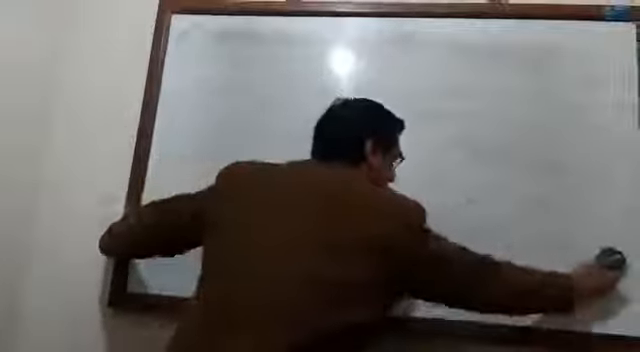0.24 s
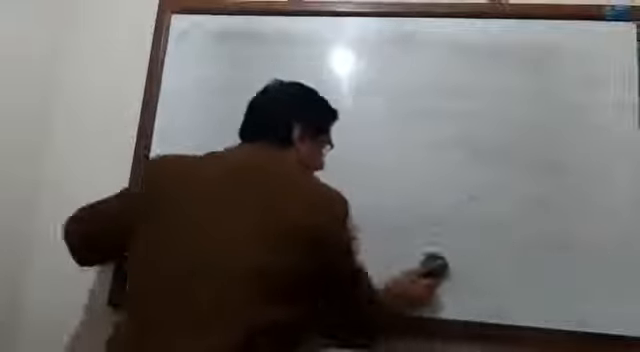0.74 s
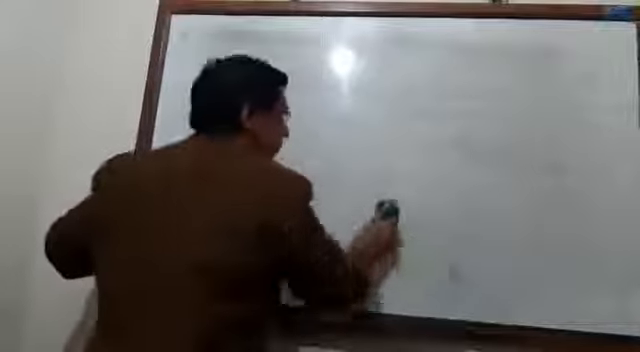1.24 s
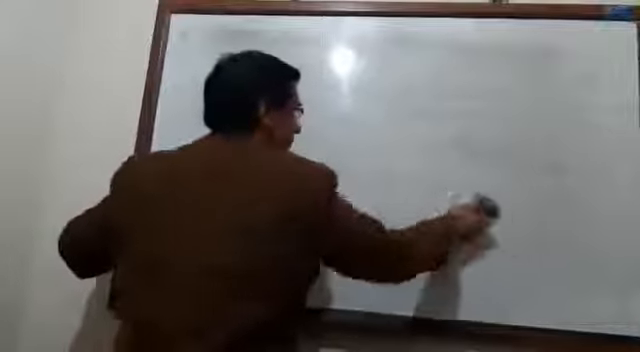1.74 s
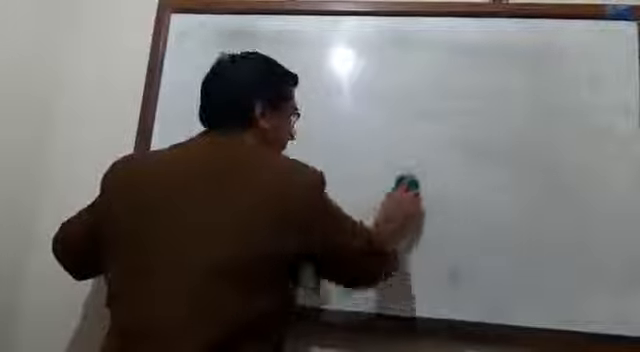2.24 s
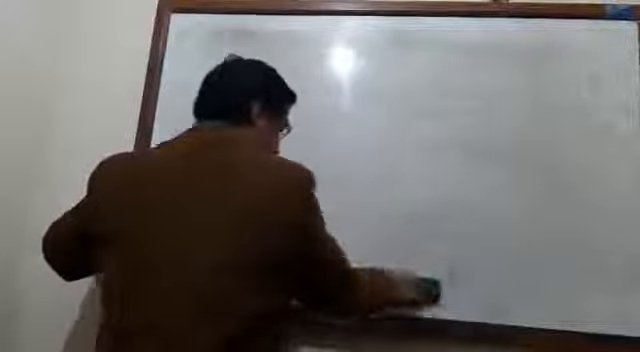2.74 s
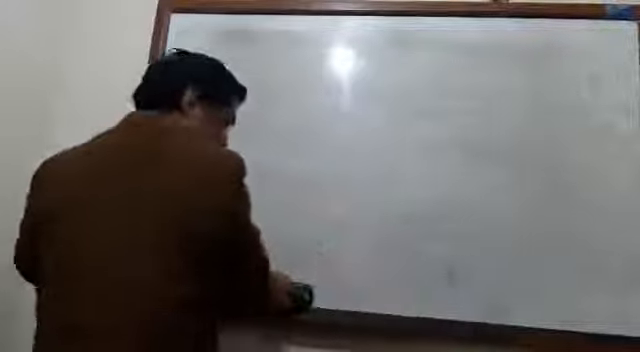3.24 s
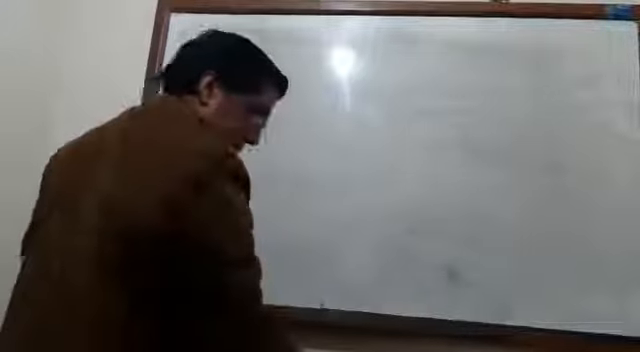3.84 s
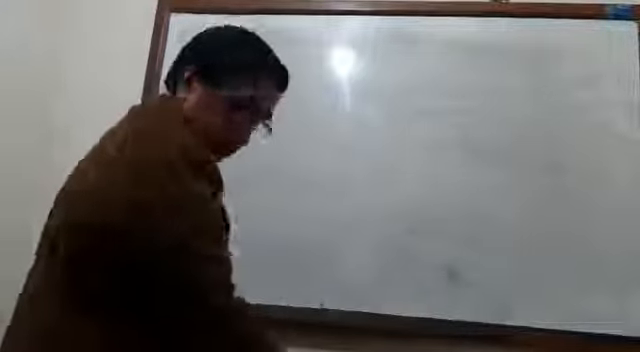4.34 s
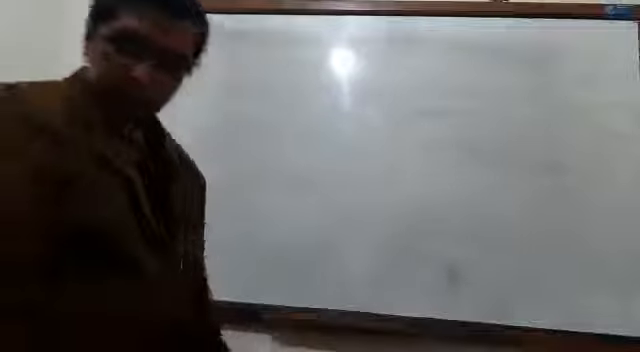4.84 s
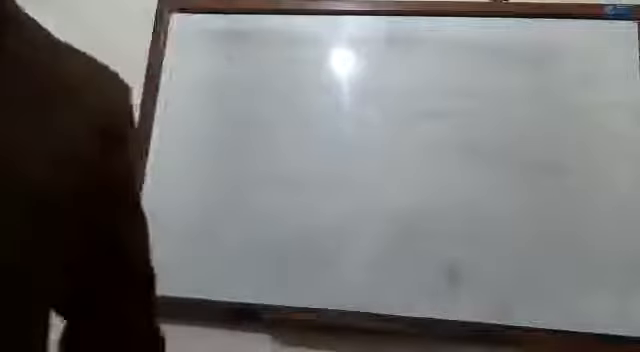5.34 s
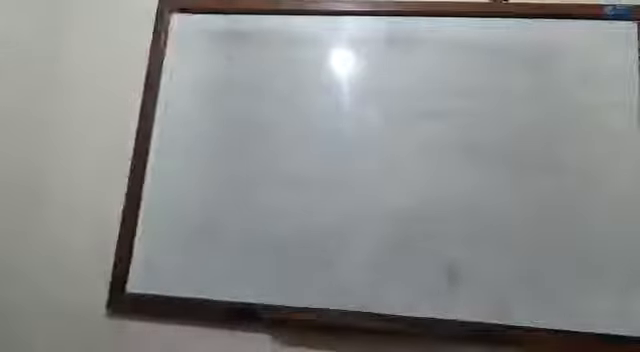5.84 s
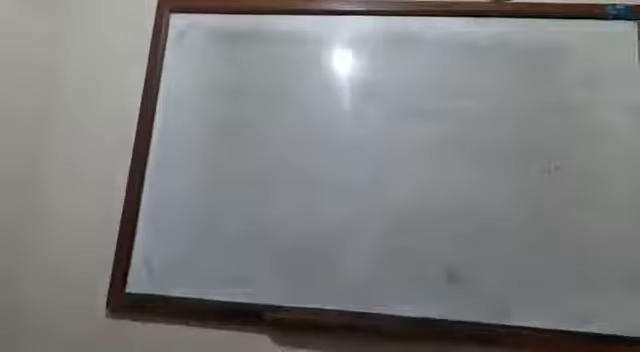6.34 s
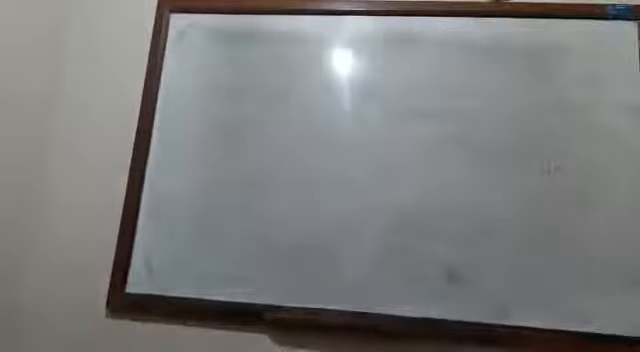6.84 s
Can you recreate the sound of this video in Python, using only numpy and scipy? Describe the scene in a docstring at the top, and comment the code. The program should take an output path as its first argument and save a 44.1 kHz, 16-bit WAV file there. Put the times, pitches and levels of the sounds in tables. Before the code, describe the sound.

A felt eraser rubs across a whiteboard from the start, a dry hiss that rises and falls with each pass while the panel drums faintly under the hand. Quicker, brighter swipes stand out around 1.1, 2.1 and 2.7 seconds. The wiping thins and stops at about 3.4 seconds, and the eraser scrapes briefly along the wooden ledge. Amid further scrapes, sharp rattling knocks land at about 4.0, 4.1 and 4.5 seconds, the loudest sounds here. The ledge rings briefly, and the last knock makes the board boom. From 4.7 seconds a coat swishes and rustles as someone shuffles away, with soft heel thuds, sole scuffs and small shoe squeaks between 5 and 7 seconds. Everything is heard from a few metres away in a bare classroom with short reverberation, over quiet room air and a faint low hum.

```python
"""A bare classroom, heard from a phone a few metres away: mostly room sound, over a faint hum.
A felt eraser hisses across a wall-mounted whiteboard in slow rubs and a few quick swipes.
It scrapes along the wooden ledge and is knocked down onto it; the ledge rings and the board booms.
Then the man shuffles off, coat rustling and shoes squeaking."""
import sys
import numpy as np
from scipy import signal
from scipy.fft import rfft, irfft, next_fast_len
from scipy.io import wavfile
from scipy.ndimage import uniform_filter1d

SR = 44100
rng = np.random.default_rng(int(sys.argv[2]) if len(sys.argv) > 2 else 0)


def digitize_waveform(pressure):
    """Quantize a signal to 16-bit integers and store it at the path in sys.argv[1].

    Rows of a 2-D input are taken as channels; values are limited to [-1, 1].
    """
    field = np.atleast_2d(pressure).T
    bounded = np.clip(field, -1, 1)
    quanta = np.round(bounded * 32767).astype(np.int16)
    wavfile.write(sys.argv[1], SR, quanta)


N = 312430
T = np.arange(N) / SR
MIC_GAP_M, SOUND_M_PER_S = 0.21, 343


# Slow passes of the arm, each lasting until the next: start_s, level_db, treble_db
PASSES = [(-.25, -52.5, -2), (.17, -57, 1), (.58, -53.5, -2), (.93, -52.5, 1), (1.27, -57, 2),
          (1.74, -56, 1), (2.25, -56, 1), (2.83, -60.5, 5.5), (3.25, -61.5, 8)]
# Tone of felt on the board: freq_hz, level_db
FELT_EQ = [(400, -31), (800, -18.5), (1100, -7.5), (1300, -5), (1500, -1), (1750, -4.5), (2100, -0.5),
           (3000, -3.5), (4600, -3.5), (6000, -9.5), (7700, -10.5), (8800, -16.5), (11800, -13),
           (15000, -17.5)]

def wiping(lift_s=3.422, turn_speed=0.68, blend_s=0.083):
    """Felt hisses with the speed of the hand: fastest mid-pass, slower through the turns, until it lifts."""
    starts, db, treble_db = np.transpose(PASSES)
    progress = np.interp(T, np.append(starts, lift_s), np.arange(len(starts) + 1))
    which = np.minimum(progress.astype(int), len(starts) - 1)
    speed = (turn_speed + (1 - turn_speed) * np.abs(np.sin(np.pi * progress))) * (T < lift_s)
    level = uniform_filter1d(speed * undb(db[which]), int(blend_s * SR))
    brightness = uniform_filter1d(undb(treble_db[which]), int(blend_s * SR))
    hiss = colour(slips(grain_db=5), FELT_EQ)
    treble = signal.sosfiltfilt(signal.butter(2, 6500, "high", fs=SR, output="sos"), hiss)
    return (hiss + treble * (brightness - 1)) * level * undb(0.48 * wander(24.87))


# Swells of the eraser's hollow shell: start_s, swell_s, fade_s, level_db, tilt_db_per_octave
SHELL_SWELLS = [(.64, 0.13, 0.11, -58, -2), (2.9, 0.24, .15, -63.5, 4.5)]
# Nasal tone of the shell: freq_hz, level_db
SHELL_EQ = [(900, -25.5), (1300, -11), (1520, 4), (1750, -12), (2050, 1), (2800, -30)]
# Quick swipes over the board: start_s, swell_s, fade_s, level_db, tilt_db_per_octave
SWIPES = [(.33, .02, 0.084, -50, 6), (.99, 0.073, 0.14, -46, 0), (1.11, 0.056, 0.048, -41, -0.2),
          (2.141, 0.02, 0.065, -46, -2.5), (2.6, 0.11, 0.11, -49, 1)]
# Bright tone of a swipe: freq_hz, level_db
SWIPE_EQ = [(180, -57), (300, -28), (331, -37), (371, -24), (1150, -7.5), (1250, -7.5), (1440, -5.5),
            (2100, -3), (2280, -6.5), (2780, -3.5), (3270, -4), (7790, -10.5), (8460, -14.5), (11700, -11),
            (15000, -15)]
# Scrapes along the ledge: start_s, swell_s, fade_s, level_db, tilt_db_per_octave
SCRAPES = [(3.497, 0.005, 0.089, -45, 2.5), (3.493, 0.055, 0.045, -37, 0.5),
           (3.905, 0.083, 0.027, -55.5, 3.5), (4.085, 0.061, 0.013, -39, 1.5),
           (4.135, 0.043, .05, -34, -0.5), (4.42, 0.049, 0.045, -42.5, 3.5)]
# Tone of the eraser sliding on wood: freq_hz, level_db
SCRAPE_EQ = [(150, -25.5), (400, -22.5), (700, -13), (1100, -10.5), (1280, -9.5), (1500, -1), (1750, -2),
             (2100, 2), (3000, -3.5), (4400, -6), (6000, -8.5), (9000, -14.5), (11500, -14.5), (15000, -18)]

def eraser_strokes():
    """The eraser's shell resonates when it lies flat; it swipes the board, then scrapes the ledge."""
    shell = friction_bursts(SHELL_SWELLS, SHELL_EQ, grain_db=2)
    swipes = friction_bursts(SWIPES, SWIPE_EQ, grain_db=5)
    scrapes = friction_bursts(SCRAPES, SCRAPE_EQ, grain_db=4)
    return shell + swipes + scrapes


# The hand leans into the board: start_s, length_s, level_db
LEANS = [(0.054, 0.12, -69), (0.278, 0.092, -59.5), (0.72, 0.067, -68), (1.017, 0.092, -73),
         (1.14, 0.2, -69), (1.33, 0.12, -62), (1.651, 0.094, -68.5), (1.782, 0.082, -69),
         (1.921, 0.13, -60), (2.23, 0.1, -66.5), (2.369, .09, -64.5), (2.484, .1, -68.5),
         (2.645, 0.13, -69)]
# Boxy tone of the rubbed panel: freq_hz, level_db
DRUM_EQ = [(90, -17), (160, -16), (260, -6.5), (390, -1), (500, -2), (620, -9.5), (820, -7.5), (1200, -29),
           (3000, -70)]

def panel_drumming(attack_s=0.017, release_s=0.043):
    """Each time the hand leans in, the felt grips and shakes the panel."""
    pressure = np.zeros(N)
    for start, length, db in LEANS:
        ramps = np.minimum((T - start) / attack_s, (start + length - T) / release_s)
        pressure += undb(db) * np.clip(ramps, 0, 1)
    return pressure * colour(slips(grain_db=3.5), DRUM_EQ)


# Eraser hits on the ledge:
# start_s, level_db, rattle_tilt_db_per_octave, rattle_db, rattle_decay_s, ring_db, panel_db
KNOCKS = [(4.011, -10.5, 0, -3.5, 0.093, -13, -25.5), (4.0374, -18.5, 2, 0, .02, -19, -31),
          (4.1404, -3.5, 2, 0.5, 0.042, 1.5, -30), (4.467, 1.5, -1.5, -5.5, 0.075, -0.5, 3)]
# Tone of the first contact: freq_hz, level_db
CLACK_EQ = [(150, -28.5), (500, -20), (750, -17), (1100, -9), (1500, 3.5), (1750, -2.5), (2130, 4.5),
            (2700, -2), (4000, -9), (6000, -13), (9000, -21), (15000, -21)]
# Tone of the wooden rattle: freq_hz, level_db
RATTLE_EQ = [(160, -56.5), (280, -16), (336, -15.5), (425, -7), (644, -6.5), (960, -4), (1530, -4.5),
             (1660, -2), (2070, -1), (4300, -1), (5170, -8), (5900, -8.5), (9100, -17.5), (11500, -13.5),
             (15000, -19.5)]
# Ring of the ledge and frame: pitch_hz, level_db, t60_s
LEDGE_MODES = [(1100, -7, .35), (1170, -11, 0.34), (1496, 0.5, 0.44), (1530, 12.5, 0.28), (1550, 3, 0.35),
               (1770, -14, 0.28), (1924, 3.5, .28), (1980, 7, 0.58), (2120, 2.5, 0.47), (2469, -10, .33),
               (2970, -5, .32), (3577, -2, .28), (4400, -8, .24)]
# Boom of the whole panel: pitch_hz, level_db, t60_s
PANEL_MODES = [(58.6, -19, 0.67), (71.3, -4.5, 0.59), (109.9, 3.5, 0.44), (141.4, -6.5, 0.72),
               (193.5, 3.5, 0.54), (223.4, 3.5, 0.46), (324, -1.5, 0.33), (346, -5.5, 0.44)]

def knocks(blow_db=2, ledge_db=-46, boom_db=-44, thud_db=-24):
    """Each blow clacks and rattles; the ledge rings, and the large panel thuds and swells into a boom."""
    hits, rings, t = np.zeros(N), np.zeros((2, N)), T[:SR]
    for start, db, tilt, rattle_db, decay, ring_db, panel_db in KNOCKS:
        chatter = slips(grain_db=8, size=len(t)) * np.exp(-(t / decay) ** 2)
        chatter /= np.linalg.norm(chatter)
        clack = colour(signal.unit_impulse(len(t)), CLACK_EQ)
        rattle = undb(rattle_db) * colour(chatter, RATTLE_EQ, tilt)
        add(hits, start, undb(db + blow_db) * (clack + rattle))
        add(hits, start, undb(panel_db + thud_db) * colour(chatter, THUD_EQ))
        add(rings, start, undb(ring_db + ledge_db) * ring(LEDGE_MODES, t, rise_s=0.0099))
        add(rings, start, undb(panel_db + boom_db) * ring(PANEL_MODES, t, rise_s=0.059))
    return hits, rings


# Swishes of the coat: start_s, swell_s, fade_s, level_db, tilt_db_per_octave
SWISHES = [(4.71, 0.03, 0.064, -66, 1), (4.845, 0.071, .22, -59.5, -0.5), (5.012, 0.022, 0.079, -54.5, 1),
           (5.11, 0.037, 0.047, -53, .5), (5.51, 0.02, .05, -63.5, 5), (5.62, 0.08, 0.095, -50, 1.3),
           (5.79, 0.031, 0.045, -60.5, -0.5), (5.872, 0.021, 0.1, -60.5, -1),
           (6.14, 0.043, 0.055, -70.5, 1), (6.205, 0.041, 0.13, -52, 3.5), (6.255, 0.05, 0.16, -51.5, -.5),
           (6.37, 0.053, .1, -45.5, -0.5), (6.633, 0.013, 0.072, -52, -1.5), (6.68, 0.034, 0.095, -53.5, 1),
           (6.78, 0.028, 0.093, -45, 0), (7.045, 0.027, .05, -52, 0.5)]
# Crisp tone of the cloth: freq_hz, level_db
COAT_EQ = [(350, -30), (600, -14.5), (650, -14.5), (1030, -9.5), (1910, -0.5), (2160, -1.5), (2570, -3.5),
           (3550, -3.5), (4770, -4.5), (6600, -10), (7960, -9), (8750, -14.5), (11000, -9.5), (13300, -10),
           (15000, -15)]

def coat(close_from_s=4.87, close_to_s=6.05):
    """The coat swishes with each movement, and its small folds rustle as it passes close by."""
    close = (T > close_from_s) & (T < close_to_s)
    rustle = undb(-70.5) * colour(slips(grain_db=8.5), COAT_EQ) * close
    swishes = friction_bursts(SWISHES, COAT_EQ, grain_db=6)
    return (rustle + swishes) * undb(1.5 + 1.2 * wander(90))


# Footfalls: start_s, swell_s, fade_s, heel_db, sole_db
STEPS = [(5.06, 0.02, 0.059, -76, -73), (5.669, 0.04, 0.064, -70, -70), (5.88, 0.022, .06, -70, -73),
         (6.11, 0.072, 0.34, -67.5, -82), (6.3, 0.028, 0.29, -63, -57), (6.636, 0.0055, 0.088, -58.5, -55),
         (6.76, 0.023, 0.11, -60.5, -61.5)]
# Low end of a heel, also used for the panel thud and mic rumble: freq_hz, level_db
THUD_EQ = [(22, -25), (50, -16), (85, 0), (130, -6.5), (200, -2), (300, -7), (700, -43.5)]
# Midrange scuff of a sole: freq_hz, level_db
SOLE_EQ = [(120, -28), (250, -13), (400, 4), (520, 3), (740, 4), (1100, -9), (2500, -21)]

def footsteps():
    """Heels thud and soles scuff as the weight comes down."""
    out = np.zeros(N)
    for start, swell, fade, heel_db, sole_db in STEPS:
        weight = stroke(swell, fade)
        contact = weight * slips(grain_db=3.5, size=len(weight))
        add(out, start, undb(heel_db) * colour(contact, THUD_EQ))
        add(out, start, undb(sole_db) * colour(contact, SOLE_EQ))
    return out


# Squeaks and creaks of shoes and floor: start_s, length_s, pitch_hz, glide_ratio, jitter_ratio, level_db
SQUEAKS = [(5.022, 0.048, 1765, 0.044, 0.072, -55), (5.14, 0.023, 1602, -0.0048, 0.12, -58),
           (5.88, 0.042, 406, .02, 0.12, -69.5), (5.888, 0.032, 2038, -0.026, 0.041, -61.5),
           (6.05, 0.19, 171, -0.025, 0.04, -70), (6.47, 0.22, 782, -0.036, 0.044, -64),
           (6.729, 0.026, 2056, .02, 0.028, -53)]

def squeaks(rough_db=5):
    """Stick-slip locks briefly onto one unsteady pitch."""
    out = np.zeros(N)
    for start, length, hz, glide, jitter, db in SQUEAKS:
        size = int(length * SR)
        pitch = hz * (1 + glide * np.linspace(-.5, .5, size) + jitter * wander(407, size))
        tone = np.sin(2 * np.pi * np.cumsum(pitch) / SR) * undb(rough_db * wander(159, size))
        add(out, start, undb(db) * unit(tone * signal.windows.tukey(size, .4)))
    return out


# Reverb time of the bare room: freq_hz, t60_s
ROOM_DECAY = [(100, 0.7), (400, 0.35), (1800, 0.4), (4000, 0.38), (12000, 0.33)]

def classroom(x, early_db=-10, early_decay_s=0.0047, build_s=0.025):
    """Quick echoes off the board and floor, then dense reflections from bare walls."""
    t = T[:2 ** 15]
    freqs = np.fft.rfftfreq(len(t), 1 / SR)
    hz, t60s = np.transpose(ROOM_DECAY)
    field, tail = rfft(diffuse(len(t))), 0
    decay_time = np.hypot(t, build_s) - build_s  # the level holds while reflections build up
    for band, t60 in zip(np.eye(len(hz)), t60s):
        share = np.interp(np.log(freqs + 1), np.log(hz), band)
        tail = tail + irfft(field * share) * undb(-60 * decay_time / t60)
    early = diffuse(len(t)) * np.exp(-t / early_decay_s) * np.minimum(t / early_decay_s * 10, 1)
    response = (unit(tail) + undb(early_db) * unit(early)) / np.sqrt(len(t))
    return signal.fftconvolve(x[None], response, axes=1)[:, :N]


def moving(x, shift_hz=3.2, direct_db=-16):
    """A source on the move: a weak direct path and an ever-changing pattern of reflections."""
    place = 2 * np.pi * shift_hz * T
    return undb(direct_db) * x + classroom(x * np.cos(place)) + classroom(x * np.sin(place))


# Tone of the room air: freq_hz, level_db
AIR_EQ = [(20, -19), (35, -22), (55, -5.5), (110, 3.5), (170, -4.5), (260, -3), (700, -8.5), (1100, -14),
          (2100, -16), (3000, -11.5), (4800, -6), (7000, -14.5), (8600, -26), (11000, -9.5), (15000, -22)]
# Fader ride of the low drone from outside: time_s, level_db
DRONE_LEVELS = [(0, -78.5), (1.2, -77), (2, -86), (3.8, -83.5), (5.3, -72), (6.08, -67), (6.2, -85),
                (7.08, -80)]

def room_tone(air_db=-73, rumble_db=-88, hum_db=-82.5, drone_hz=57.3):
    """Quiet air, each mic's own rumble, a wavering drone and a thin hum that dips as the wiping ends."""
    air = undb(air_db) * np.array([colour(side, AIR_EQ) for side in diffuse(N)])
    rumble = undb(rumble_db) * np.array([colour(side, THUD_EQ) for side in rng.standard_normal((2, N))])
    phase = 2 * np.pi * np.cumsum(drone_hz * (1 + 0.02135 * wander(7.2))) / SR
    drone_db = np.interp(T, *np.transpose(DRONE_LEVELS)) + 2 * wander(8.9)
    drone = unit(np.sin(phase) + undb(-9) * np.sin(2 * phase)) * undb(drone_db)
    dip_db = np.interp(T, [2.8, 3.8], [0, -5])
    hum = unit(np.sin(3 * phase)) * undb(hum_db + dip_db + 2.4 * wander(9.1))
    return air + rumble + drone + hum


def friction_bursts(cues, eq, grain_db):
    """Short bursts of friction that swell and fade with the speed of the movement."""
    out = np.zeros(N)
    for start, swell, fade, db, tilt in cues:
        speed = stroke(swell, fade)
        add(out, start, undb(db) * speed * colour(slips(grain_db, len(speed)), eq, tilt))
    return out


def slips(grain_db, size=N):
    """Friction: countless tiny slips whose strength changes about every millisecond."""
    return unit(rng.standard_normal(size) * undb(grain_db * wander(900, size)))


def stroke(swell_s, fade_s):
    """Envelope of a short movement: up, then down to rest."""
    t = np.arange(int((swell_s + fade_s) * SR)) / SR
    return np.sin(np.pi / 2 * np.interp(t, [0, swell_s, swell_s + fade_s], [0, 1, 0])) ** 2


def ring(modes, t, rise_s):
    """Modes swell after a blow and decay; each reaches the two mics from its own direction."""
    out = 0
    for (hz, db, t60), (phase, direction) in zip(modes, rng.random((len(modes), 2))):
        lag = np.array([[.5], [-.5]]) * (2 * direction - 1) * MIC_GAP_M / SOUND_M_PER_S
        out = out + undb(db - 60 * t / t60) * np.sin(2 * np.pi * (hz * (t + lag) + phase))
    return out * (1 - np.exp(-(t / rise_s) ** 2))


def diffuse(size):
    """Noise from all sides at two mics: alike in the bass, wide once half a wave fits between them."""
    half_waves = 2 * np.fft.rfftfreq(size, 1 / SR) * MIC_GAP_M / SOUND_M_PER_S
    likeness = np.exp(-2 * half_waves ** 2)
    phasors = np.exp(2j * np.pi * rng.random((2, size // 2 + 1)))
    mid, side = phasors * np.sqrt([1 + likeness, 1 - likeness])
    return unit(irfft([mid + side, mid - side], size))


def colour(x, eq, tilt_db_per_octave=0, taps=4096):
    """Minimum-phase EQ with a tilt above 600 Hz; keeps the power of white noise."""
    size = next_fast_len(len(x) + taps, real=True)
    freqs = np.maximum(np.fft.rfftfreq(taps, 1 / SR), 1)
    hz, db = np.transpose(eq)
    tilt_db = tilt_db_per_octave * np.log2(np.maximum(freqs, 600) / 2500)
    gain = undb(np.interp(np.log(freqs), np.log(hz), db) + tilt_db)
    cepstrum = irfft(np.log(unit(gain) + 1e-6))
    cepstrum[1:len(freqs) - 1] *= 2  # folded forward, so nothing rings ahead of a hit
    cepstrum[len(freqs):] = 0
    response = irfft(np.exp(rfft(cepstrum)))
    return irfft(rfft(x, size) * rfft(response, size), size)[:len(x)]


def wander(rate_hz, size=N):
    """Smooth random motion, spread near 1."""
    knots = rng.standard_normal(int(size / SR * rate_hz) + 2)
    return np.sqrt(3 / 2) * np.interp(np.arange(size) / SR * rate_hz, np.arange(len(knots)), knots)


def add(track, start_s, x):
    """Mix x into the track at a time."""
    i = int(start_s * SR)
    track[..., i:i + x.shape[-1]] += x[..., :N - i]


def undb(db):
    """Decibels to gain."""
    return 10 ** (np.asarray(db) / 20)


def unit(x):
    """Scale to rms 1."""
    return x / np.sqrt(np.mean(x ** 2))


def scene():
    """Rubbing, knocks and steps fill the room; the ledge faces the phone, so its clacks are more direct."""
    hits, rings = knocks()
    clacks = undb(-10.3) * hits + classroom(hits)
    eraser = eraser_strokes() + wiping() + panel_drumming()
    walking = coat() + footsteps() + squeaks()
    return moving(eraser + walking) + clacks + rings + room_tone()


# Tonal balance of the two mics: freq_hz, left_minus_right_db
MIC_BALANCE = [(60, 2.5), (1000, -0.2), (4400, 1), (8000, 0), (15000, -4.5)]

def record(dry, low_cut_hz=31, high_cut_hz=15050):
    """Each mic of the phone has its own colour; the deepest bass and the top are cut."""
    hz, db = np.transpose(MIC_BALANCE)
    balance_db = np.interp(np.log(np.fft.rfftfreq(N, 1 / SR) + 1), np.log(hz), db)
    heard = irfft(rfft(dry) * undb(np.array([balance_db, -balance_db]) / 2), N)
    heard = signal.sosfilt(signal.butter(4, low_cut_hz, "high", fs=SR, output="sos"), heard)
    return signal.sosfilt(signal.ellip(10, .2, 70, high_cut_hz, fs=SR, output="sos"), heard)


dry = scene()
out = record(dry)
digitize_waveform(out)
```